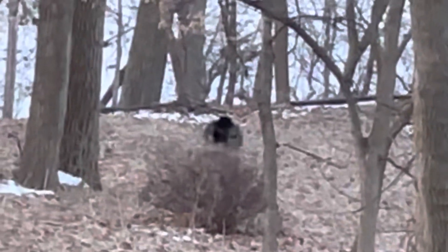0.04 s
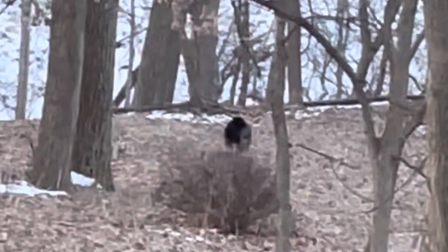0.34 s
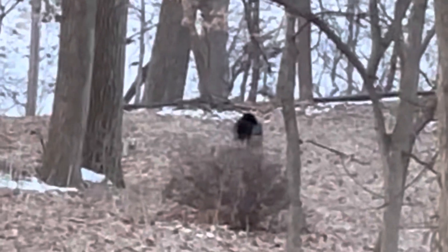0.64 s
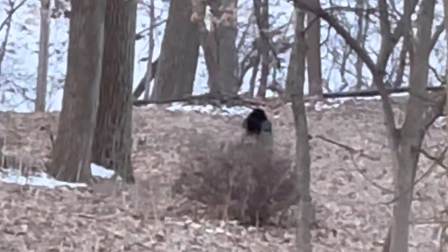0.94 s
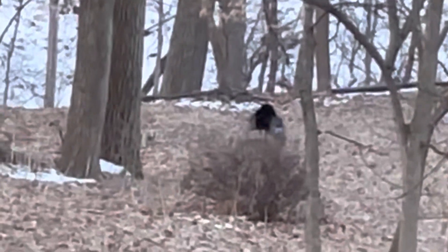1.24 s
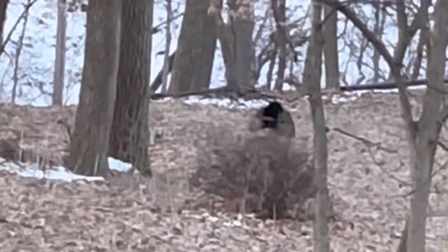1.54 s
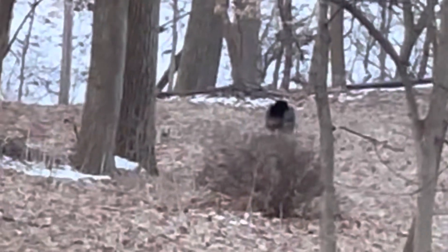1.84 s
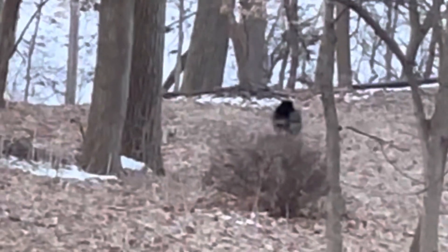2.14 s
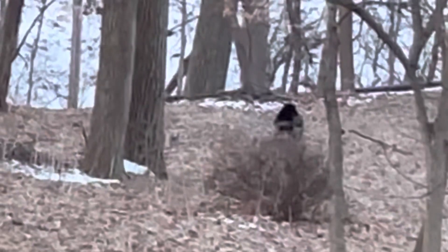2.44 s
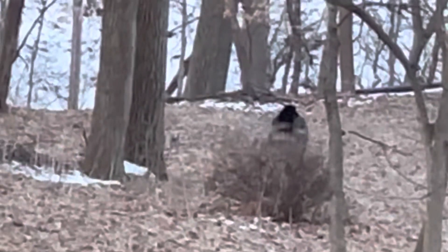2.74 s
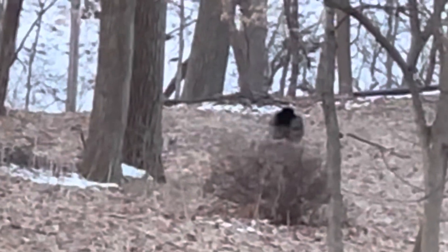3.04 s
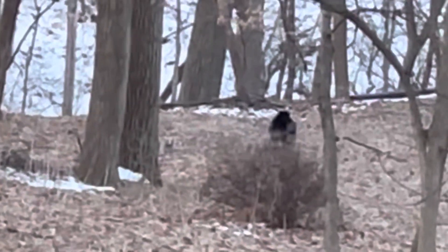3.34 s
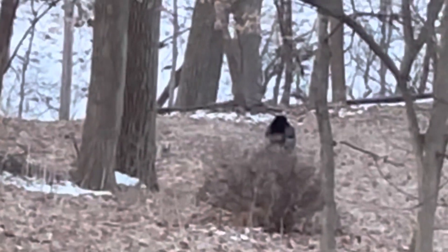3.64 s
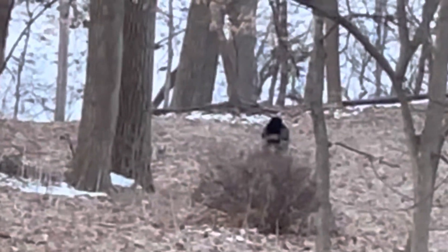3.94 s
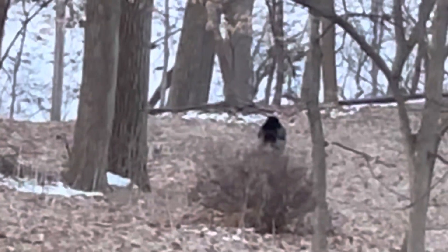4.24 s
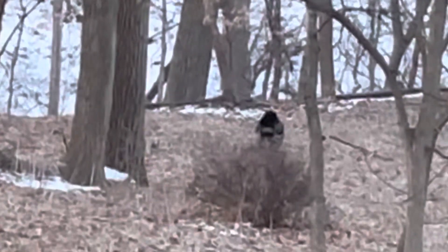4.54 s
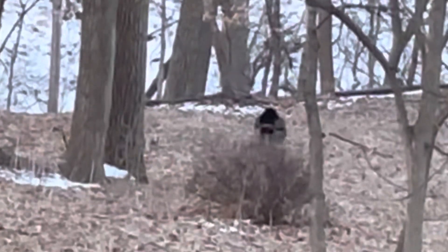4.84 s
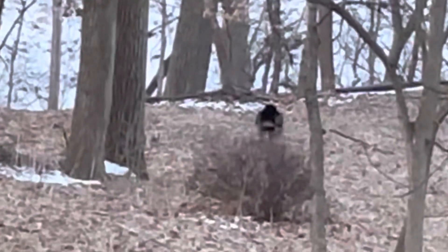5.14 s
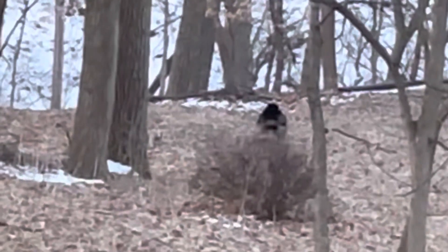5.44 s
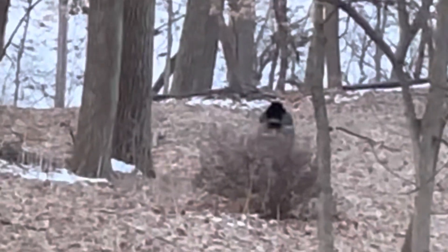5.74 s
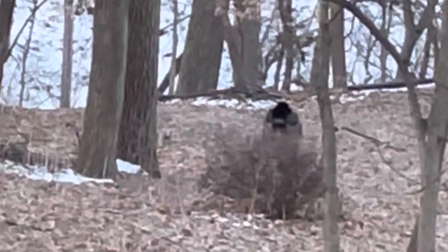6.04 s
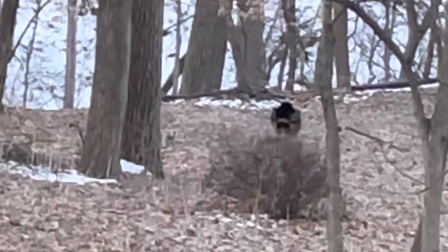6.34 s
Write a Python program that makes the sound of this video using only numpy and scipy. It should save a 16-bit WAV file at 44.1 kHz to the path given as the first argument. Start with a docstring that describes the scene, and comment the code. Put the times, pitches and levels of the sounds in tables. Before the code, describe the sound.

A songbird whistles one quick phrase four times as a wild turkey gives two short, raspy calls. The turkey calls twice more, then a woodpecker drums one roll on a dead limb, slightly to the left. One last turkey call follows, and faint far birds chatter near the end. The sounds echo lightly among the trees, heard from some distance over a steady low rumble of far traffic.

```python
"""Wild turkey in winter woodland.

A turkey gives five short calls: pitch arches through a fixed throat, rasped by period doubling.
A songbird whistles one phrase four times. A woodpecker drums one roll on a dead limb.
Far birds chatter, whistle and chip; a twig ticks once. Trunks scatter each of these sounds.
Distant traffic rumbles below, under a faint hiss."""
import sys
import numpy as np
from scipy import signal
from scipy.fft import rfft, irfft
from scipy.io import wavfile
from scipy.ndimage import uniform_filter1d

SR = 44100
rng = np.random.default_rng(int(sys.argv[2]) if len(sys.argv) > 2 else 0)


def put_to_file(sound):
    """Save the sound as 16-bit audio at rate SR, in the file named by the first command-line argument."""
    columns = np.atleast_2d(sound).T  # one column per channel
    safe = np.clip(columns, -1, 1)
    whole_steps = np.round(safe * 32767)
    wavfile.write(sys.argv[1], SR, whole_steps.astype(np.int16))


N = 290178
PREROLL = SR // 5  # samples before time zero, so the song already rings

# turkey calls: (start [s], rise [s], fall [s], start [Hz], top [Hz], end [Hz], level [dB], rasp [0-1])
TURKEY_CALLS = [(.461, 0.046, 0.044, 1400, 1754, 1250, -31, .95),
                (0.635, 0.05, 0.064, 1421, 1834, 1220, -31, .85),
                (2.557, 0.052, 0.056, 1252, 1725, 1109, -31, 0.78),
                (2.738, .054, .058, 1246, 1850, 1143, -32.5, .75),
                (5.226, 0.04, 0.06, 1479, 1759, 1136, -32, 1)]
# turkey throat and beak: (frequency [Hz], gain [dB])
THROAT = [(700, -49), (1250, -16), (1750, -6.5), (2050, -19), (2350, -10), (2950, -3.5), (3300, 1.5),
          (3650, -0.5), (3980, -12.5), (4350, -2.5), (4800, -5), (5300, -13.5), (6200, -12), (7500, -27.5),
          (10500, -30), (14000, -49.5)]
# songbird's fixed notes: (offset [s], length [s], start [Hz], middle [Hz], end [Hz], level [dB])
SONG_MOTIF = [(0, 0.031, 5650, 4526, 4294, -5), (.03, 0.023, 3060, 3173, 3590, -2),
              (.144, 0.021, 3070, 2860, 2870, -3), (.2, .05, 1880, 1777, 1721, -18),
              (.286, .042, 3000, 3043, 2860, -.8)]
# its phrases: (start [s], offset stretch [ratio], peak note [Hz], held note [s], slur [s], level [dB])
SONG_PHRASES = [(-.056, .99, 3664, .09, .043, -44), (.457, 1.006, 3840, 0.024, 0.027, -42.5),
                (.973, .99, 3878, 0.071, 0.024, -41), (1.495, 1.015, 3877, 0.02, .066, -41.5)]
# modes of the drummed limb: (frequency [Hz], level [dB], rise to full swing [s])
LIMB_MODES = [(622, -10, 0.0048), (804.5, -7.5, 0.0035), (867, -4, 0.0024), (1336, -10, 0.0011),
              (1520, -21, .003), (1770, -12.5, 0.00087)]
# far bird's hoarse motif: (offset [s], length [s], start [Hz], middle [Hz], end [Hz], level [dB])
FAR_MOTIF = [(0, .07, 3020, 3280, 3810, 0), (.055, .05, 4200, 4550, 4600, -2),
             (.095, .05, 3200, 2700, 2400, -4.5)]
# its repeats: (start [s], level [dB])
FAR_PHRASES = [(2.34, -64.5), (4.3, -68), (6.4, -61)]
# single hoarse far notes: (start [s], length [s], pitch [Hz], level [dB])
FAR_NOTES = [(2.325, .03, 3500, -68.5), (3.173, .12, 3670, -82), (4.613, .09, 3450, -80),
             (4.9, .12, 3400, -87), (6.23, .09, 3090, -73.5), (6.27, 0.047, 4200, -78),
             (6.372, .035, 4910, -71.5), (6.465, .055, 4347, -62), (6.492, .03, 3230, -57.5),
             (6.485, 0.045, 2284, -56)]
# low whistles of another far bird: (start [s], pitch [Hz], level [dB])
FAR_WHISTLES = [(3.095, 1438, -62.5), (3.48, 1470, -64), (3.87, 1460, -62.5), (4.26, 1516, -71),
                (4.72, 1530, -80)]
# chips of small birds: (start [s], pitch [Hz], level [dB])
CHIPS = [(3.545, 5000, -80), (3.725, 5100, -81.5), (3.895, 5100, -84), (4.296, 5570, -83),
         (5.57, 6200, -75)]
# forest decay: (frequency [Hz], T60 [s])
FOREST_T60 = [(500, 0.98), (1000, 0.64), (2200, 1.15), (3200, 0.74), (5000, 0.64), (7000, 0.36),
              (12000, 0.52)]
# direction of the turkey: (frequency [Hz], left phase lead [rad])
TURKEY_LEAD = [(0, -1.5), (700, -3.5), (1300, 1.5), (1700, 2), (2200, 0.8), (3100, 0.1), (3900, 0),
               (4600, -1), (6000, -2.3), (11000, -1.83)]
# direction of the canopy: (frequency [Hz], left phase lead [rad])
CANOPY_LEAD = [(0, -1.8), (1700, 0.56), (3000, -0.4), (4300, 0.83), (6000, -1.65), (11000, -0.5)]
# traffic rumble: (frequency [Hz], relative density [dB])
TRAFFIC_SPECTRUM = [(15, -33), (30, -17.5), (48, -1), (75, 0.5), (125, -8.5), (220, -8), (300, -15.5),
                    (420, -19.5), (620, -20.5), (800, -26.5), (1000, -34.5), (1250, -46.5), (2000, -77.5)]
# woodland hiss: (frequency [Hz], relative density [dB])
HISS_SPECTRUM = [(600, -20), (1100, 0), (1500, -4), (2000, -8), (3200, -10), (4000, -15), (5000, -20),
                 (6300, -24), (10000, -29), (12500, -35), (15000, -50)]
# background stereo image: (frequency [Hz], left-right correlation [0-1])
CORRELATION = [(50, 0.96), (150, 0.99), (350, 0.86434), (700, 0.37), (1500, 0.58), (4000, 1), (12000, .3)]
# microphone response: (frequency [Hz], gain [dB])
MICROPHONE = [(20, 1), (6400, 2), (7200, -27.5), (8400, -29.5), (9100, 2.5), (13500, 9.5), (14300, -11.5)]


def turkey(swell_db=7, drop_db=8.5, attack_s=.009, subharmonic_db=-4, fundamental_db=-6):
    """Pitch arch through a fixed throat; period doubling rasps the rise, the tone clears at the top."""
    out = np.zeros(PREROLL + N)
    for start_s, rise_s, fall_s, start_hz, top_hz, end_hz, db, raspiness in TURKEY_CALLS:
        t = np.arange(int((rise_s + fall_s) * SR)) / SR
        place = np.interp(t, [0, rise_s, rise_s + fall_s], [0, 1, 2])  # start, top, end
        arch = 1 - np.abs(place - 1) ** 1.4
        foot_hz = np.where(place < 1, start_hz, end_hz)
        hz = foot_hz + arch * (top_hz - foot_hz)
        clear = smooth_step(place, middle=.95, width=.15)
        rasp = raspiness * (1 - .56 * clear)
        cycles = np.cumsum(hz * (1 + .055 * rasp * wander(len(t), rate_hz=450))) / SR
        source = np.zeros(len(t))
        for k in np.arange(2, 23) / 2:
            strength = amp(subharmonic_db) * rasp if k % 1 else amp(fundamental_db * (k == 1))
            # turbulence frays higher partials more; the fundamental stays hoarse
            depth = .38 * rasp * min(k, 4) + .35 * (k == 1)
            fray = depth * (wander(len(t), rate_hz=600) + 1j * wander(len(t), rate_hz=600)) / 2
            source += ((strength + fray) * np.exp(2j * np.pi * (k * cycles + rng.random()))).real
        bins_hz = np.fft.rfftfreq(len(t), 1 / SR)
        spectrum = rfft(source) * amp(lookup(THROAT, bins_hz))
        upper = np.clip((bins_hz - 3600) / 700, 0, 1)  # above the main resonance
        bright_db = 11 - 24.5 * clear
        voice = irfft(spectrum * (1 - upper), len(t)) + amp(bright_db) * irfft(spectrum * upper, len(t))
        voice /= np.sqrt(uniform_filter1d(voice ** 2, size=500) + 1e-12)
        effort_db = -swell_db * np.maximum(1 - place, 0)
        effort_db -= drop_db * smooth_step(place, middle=1.357, width=.095)
        attack = np.minimum(t / attack_s, 1) ** 2
        add(out, start_s, voice * attack * amp(db + effort_db) * signal.windows.tukey(len(t), .06))
    return out


def songbird(sink_hz_per_s=3400, fade_db_per_s=94.5):
    """Repeated whistled phrase; three notes vary. A longer closing slur is lower and softer."""
    notes = []
    for start_s, stretch, peak_hz, held_s, slur_s, db in SONG_PHRASES:
        peak = note(start_s=.05, length_s=.022, hz=peak_hz, db=-3.5)
        held = note(start_s=.098, length_s=held_s, hz=2464, db=-9)
        slur_hz = 2386 - sink_hz_per_s * slur_s
        slur = note(start_s=.338, length_s=slur_s, hz=slur_hz, db=-2 - fade_db_per_s * slur_s, fall=.2)
        notes += phrase(SONG_MOTIF + [peak, held, slur], start_s, db, stretch)
    return whistles(notes, waver=.013, waver_hz=300, flutter_db=4, second_db=-41.5, sheen_db=-40,
                    taper=.18)


def whistles(notes, waver, waver_hz, flutter_db, second_db, sheen_db, taper=.5):
    """Wavering glides through three pitches; each swells in and has faint overtones."""
    out = np.zeros(PREROLL + N)
    for start_s, length_s, start_hz, middle_hz, end_hz, db in notes:
        progress = np.linspace(0, 1, int(length_s * SR))
        size = len(progress)
        hz = np.polyval(np.polyfit([0, .5, 1], [start_hz, middle_hz, end_hz], 2), progress)
        phase = 2 * np.pi * np.cumsum(hz * (1 + waver * wander(size, waver_hz))) / SR
        sheen = sum(np.sin(k * phase) * np.exp(-((k * hz - 11300) / 1600) ** 2) for k in range(2, 6))
        tone = np.sin(phase) + amp(second_db) * np.sin(2 * phase) + amp(sheen_db) * sheen
        onset_db = -12 * np.clip(1 - progress / .35, 0, 1)
        envelope = amp(db + onset_db + flutter_db * wander(size, rate_hz=120))
        add(out, start_s, np.sqrt(2) * tone * envelope * signal.windows.tukey(size, taper))
    return out


def note(start_s, length_s, hz, db, fall=0):
    """Note row; pitch sinks by the fraction fall, fastest at first."""
    return start_s, length_s, hz * (1 + fall * 3 / 4), hz, hz * (1 - fall / 4), db


def phrase(motif, start_s, db, stretch=1):
    """Note rows of a motif, shifted in time and level."""
    return [(start_s + offset_s * stretch, length_s, *pitches_hz, db + note_db)
            for offset_s, length_s, *pitches_hz, note_db in motif]


def woodpecker(start_s=3.285, blows=12, first_gap_s=.0537, settled_gap_s=.0685, contact_s=.0008):
    """Bill blows ring the damped modes of a dead limb; the roll slows and gains force."""
    t = np.arange(SR // 10) / SR
    knock = sum(amp(db) * t / rise_s * np.exp(1 - t / rise_s) * np.sin(2 * np.pi * hz * t)
                for hz, db, rise_s in LIMB_MODES)
    knock *= 1 - np.exp(-(t / contact_s) ** 2)  # bill contact rounds the onset
    out = np.zeros(PREROLL + N)
    blow_s = start_s
    for k in range(blows):
        lag_s, weaker_db = (.0055, 1) if k == blows - 1 else (0, 0)
        db = -38 - 11 * np.exp(-k / 2.2) - weaker_db
        add(out, blow_s + lag_s, amp(db) * knock)
        blow_s += settled_gap_s + (first_gap_s - settled_gap_s) * np.exp(-k / 3.6)
    return out


def far_chatter():
    """Far phrase about every 2 s, plus single notes; fast pitch waver makes them hoarse."""
    notes = [row for start_s, db in FAR_PHRASES for row in phrase(FAR_MOTIF, start_s, db)]
    notes += [note(*row, fall=.18) for row in FAR_NOTES]
    return whistles(notes, waver=.065, waver_hz=500, flutter_db=2, second_db=-26, sheen_db=-59.5)


def far_whistler(length_s=.072):
    """Low, clear, falling whistles of a far bird."""
    notes = [note(start_s, length_s, hz, db, fall=.13) for start_s, hz, db in FAR_WHISTLES]
    return whistles(notes, waver=.015, waver_hz=200, flutter_db=3, second_db=-30, sheen_db=-55)


def small_birds(length_s=.02):
    """Tiny, high, falling chips."""
    notes = [note(start_s, length_s, hz, db, fall=.1) for start_s, hz, db in CHIPS]
    return whistles(notes, waver=.02, waver_hz=400, flutter_db=1.5, second_db=-40, sheen_db=-60)


def twig(start_s=6.015, level_db=-64, decay_s=.001, band_hz=(1500, 4200)):
    """One dry tick in the leaf litter: a damped noise burst."""
    t = np.arange(SR // 25) / SR
    bandpass = signal.butter(2, band_hz, "band", fs=SR, output="sos")
    snap = signal.sosfilt(bandpass, rng.standard_normal(len(t)))
    out = np.zeros(PREROLL + N)
    add(out, start_s, amp(level_db) * unit_rms(snap) * np.exp(-t / decay_s))
    return out


def woods(sound, lead, direct_db, near_db, near_s, ring_db, pan_left_db, echoes_per_s=4000):
    """Direct path, quick echoes off near trunks and the long ring of the forest, in stereo."""
    t = np.arange(SR) / SR
    mid, side, ring_a, ring_b = rng.standard_normal((4, SR))
    trunks = (rng.random(SR) < echoes_per_s / SR) * (t > .003) * np.exp(-t / near_s)
    near = np.array([mid + .28 * side, mid - .28 * side]) * trunks
    hz, frame_s, frames = signal.stft(stereo_pair(ring_a, ring_b, correlation=.82), SR, nperseg=256)
    decay = amp(-60 * frame_s / lookup(FOREST_T60, hz)[:, None])
    ring = signal.istft(frames * decay, SR, nperseg=256)[1][:, :SR]
    ring *= 1 - np.exp(-t / .013)
    response = (amp(near_db) * unit_rms(near) + amp(ring_db) * unit_rms(ring)) / np.sqrt(SR)
    response *= amp([[pan_left_db], [-pan_left_db]])
    response[:, 0] += amp(direct_db)
    left, right = signal.fftconvolve(sound[None], response, axes=1)[:, PREROLL:PREROLL + N]
    lead_rad = lookup(lead, np.fft.rfftfreq(N, 1 / SR))
    return np.array([irfft(rfft(left) * np.exp(1j * lead_rad), N), right])


def background(spectrum, level_db, swell_db, swell_hz):
    """Steady, slightly swelling noise; near mono in the bass."""
    hz = np.fft.rfftfreq(N, 1 / SR)
    a, b = rfft(rng.standard_normal((2, N)))
    pair = stereo_pair(a, b, lookup(CORRELATION, hz)) * amp(lookup(spectrum, hz))
    return amp(level_db) * unit_rms(irfft(pair, N) * amp(swell_db * wander(N, swell_hz)))


def stereo_pair(a, b, correlation):
    """Correlated left and right from two independent noises."""
    return np.array([a, correlation * a + np.sqrt(1 - correlation ** 2) * b])


def amp(db):
    """dB to gain."""
    return 10 ** (np.asarray(db) / 20)


def unit_rms(x):
    """Scale to rms 1."""
    return x / np.sqrt(np.mean(x ** 2) + 1e-20)


def lookup(table, hz):
    """Interpolate on a log-frequency axis."""
    table_hz, values = np.transpose(table)
    return np.interp(np.log(hz + 1), np.log(table_hz + 1), values)


def add(mix, start_s, sound):
    """Add a sound to a mix that starts PREROLL samples early."""
    part = mix[max(round(start_s * SR) + PREROLL, 0):][:len(sound)]
    part += sound[:len(part)]


def wander(size, rate_hz):
    """Low-passed noise, rms 1."""
    hz = np.fft.rfftfreq(size, 1 / SR)
    return unit_rms(irfft(rfft(rng.standard_normal(size)) * np.exp(-(hz / rate_hz) ** 2), size))


def smooth_step(x, middle, width):
    """Sigmoid from 0 to 1."""
    return (1 + np.tanh((x - middle) / (2 * width))) / 2


def scene():
    """Birds at their distances, over traffic and hiss."""
    calls = woods(turkey(), TURKEY_LEAD,
                  direct_db=-3, near_db=-8.5, near_s=.023, ring_db=-25, pan_left_db=.5)
    song = woods(songbird(), CANOPY_LEAD,
                 direct_db=-1.5, near_db=-2.5, near_s=.033, ring_db=-9.5, pan_left_db=1.5)
    chatter = woods(far_chatter(), CANOPY_LEAD,
                    direct_db=-6, near_db=-6.5, near_s=.03, ring_db=-5.5, pan_left_db=1.2)
    low_whistles = woods(far_whistler(), CANOPY_LEAD,
                         direct_db=-3, near_db=-4, near_s=.03, ring_db=-8.5, pan_left_db=3)
    chips = woods(small_birds(), CANOPY_LEAD,
                  direct_db=-5.5, near_db=-11.5, near_s=.03, ring_db=-19, pan_left_db=-1.5)
    knocks = woods(woodpecker() + twig(), CANOPY_LEAD,
                   direct_db=1, near_db=-6.5, near_s=.015, ring_db=-9.5, pan_left_db=1.2)
    knocks *= amp([[1.6], [-1.6]])  # further left
    traffic = background(TRAFFIC_SPECTRUM, level_db=-49, swell_db=.35, swell_hz=3)
    hiss = background(HISS_SPECTRUM, level_db=-80, swell_db=.7, swell_hz=2.8)
    return calls + song + chatter + low_whistles + chips + knocks + traffic + hiss


def record(dry):
    """Microphone colour with a deep dip near 8 kHz, then a low-pass."""
    coloured = irfft(rfft(dry) * amp(lookup(MICROPHONE, np.fft.rfftfreq(N, 1 / SR))), N)
    lowpass = signal.firwin(511, cutoff=15700, window=("kaiser", 9), fs=SR)
    return signal.oaconvolve(coloured, lowpass[None], "same")


dry = scene()
out = record(dry)
put_to_file(out)
```